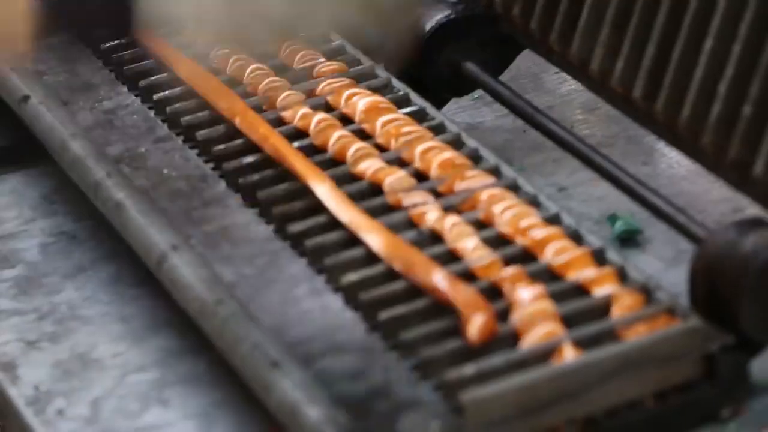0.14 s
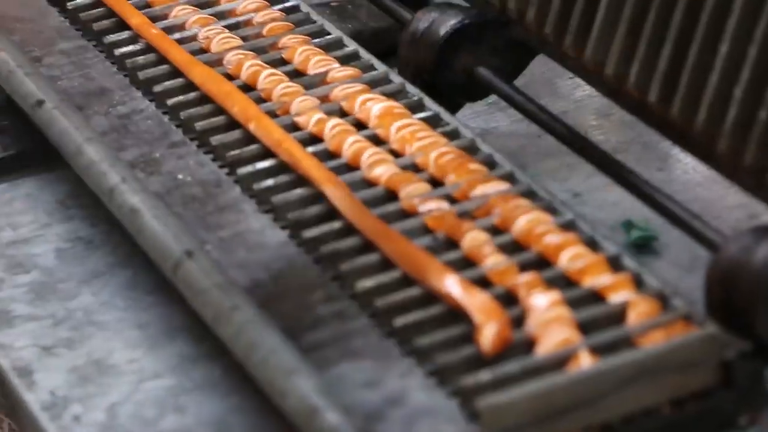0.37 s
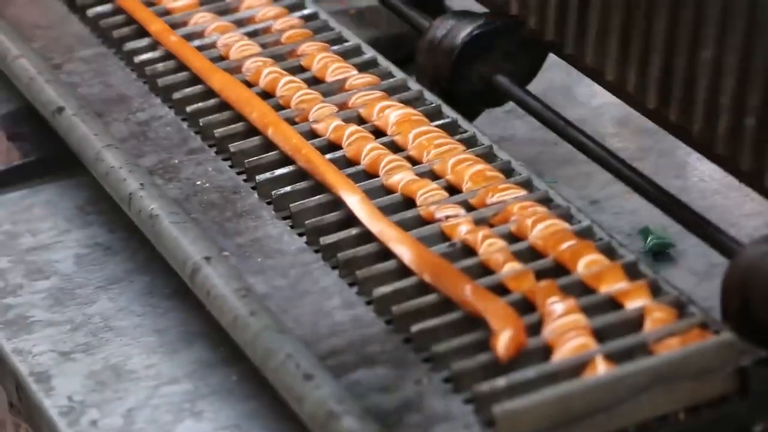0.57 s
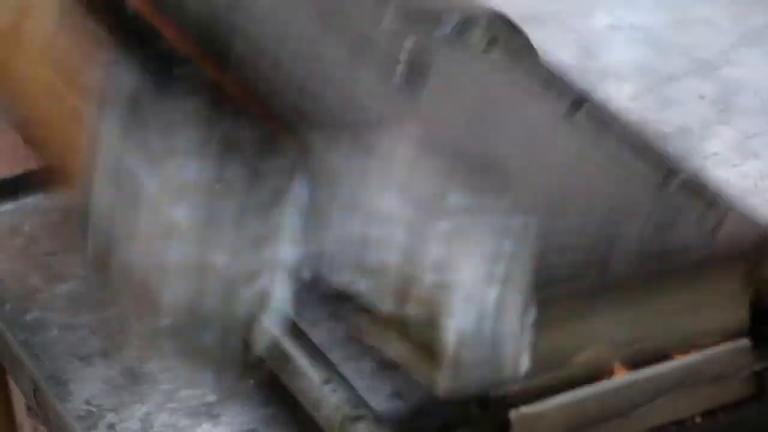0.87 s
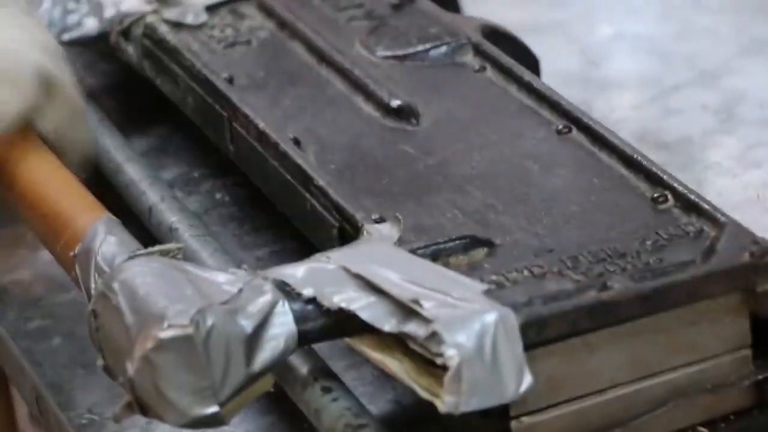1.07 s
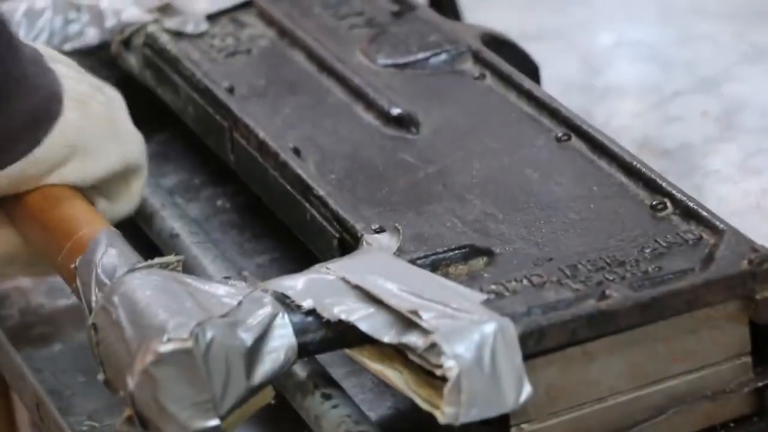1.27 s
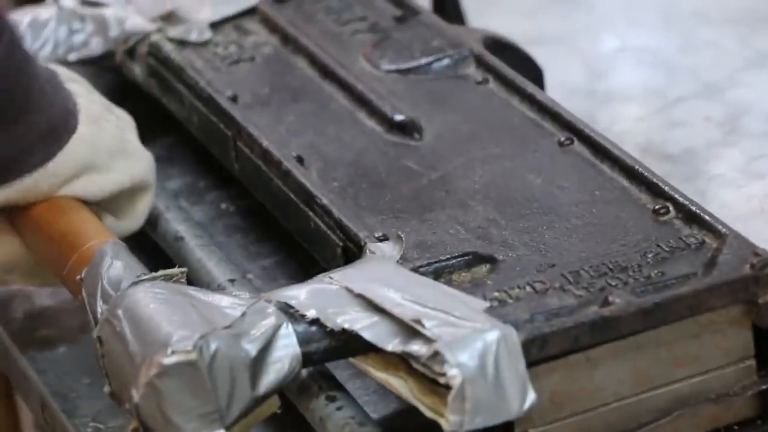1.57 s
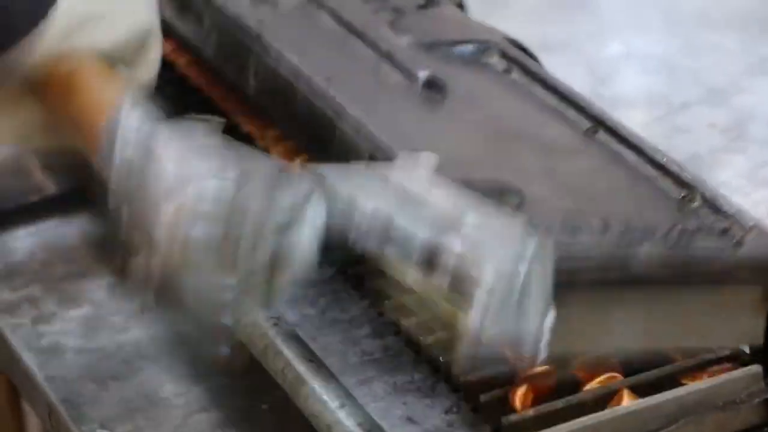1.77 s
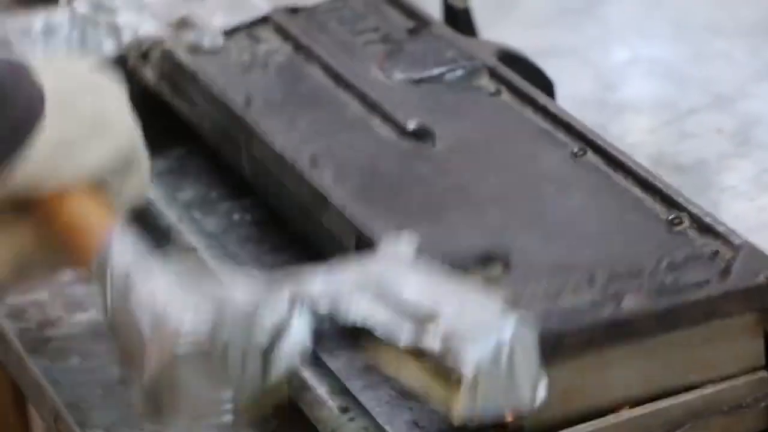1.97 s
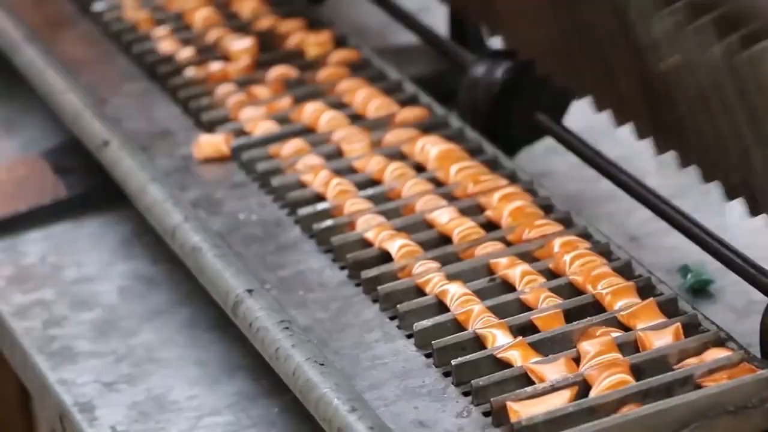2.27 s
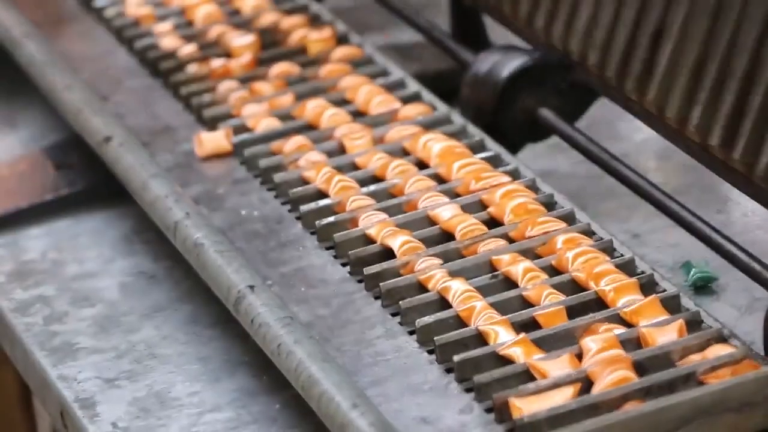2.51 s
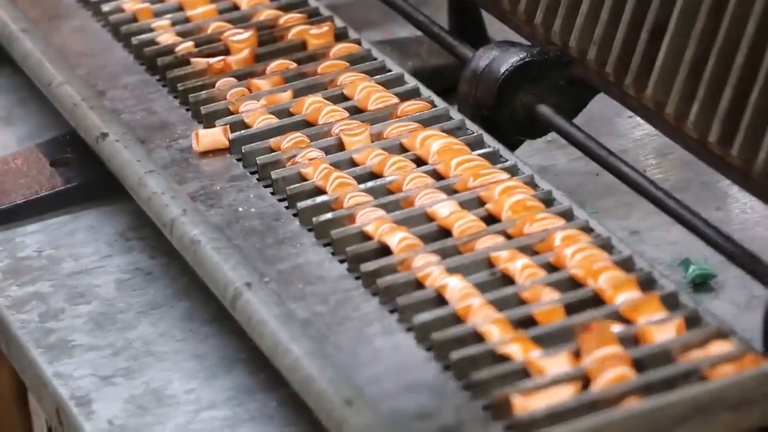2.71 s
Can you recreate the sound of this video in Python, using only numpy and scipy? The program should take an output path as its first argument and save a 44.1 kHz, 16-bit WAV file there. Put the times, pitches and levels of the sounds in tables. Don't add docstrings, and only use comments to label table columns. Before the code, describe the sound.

Close up on a workbench, a heavy iron candy cutter clacks, bangs shut and is struck repeatedly; brittle pieces crunch and scatter, bench thuds, bars ping briefly, and low distant machine noise swells back in gaps.

```python
import sys
import numpy as np
from scipy import signal
from scipy.fft import rfft, irfft, next_fast_len
from scipy.io import wavfile
from scipy.ndimage import uniform_filter1d, map_coordinates

SR = 44100
rng = np.random.default_rng(int(sys.argv[2]) if len(sys.argv) > 2 else 0)


def rack_gain(trim_db):
    fader = np.asarray(trim_db, float)
    return 10 ** (fader / 20)


def bounce(signal):
    frames = np.transpose(np.atleast_2d(signal))
    limited = np.clip(frames, -1, 1)
    pcm = np.round(limited * 32767).astype(np.int16)
    wavfile.write(sys.argv[1], SR, pcm)


N = 125685
T = np.arange(N) / SR

# start in seconds, hold in
# seconds, 60 dB decay in seconds, level in dB, brightness in dB.
CLATTERS = [(0.163, 0.024, 0.2, -20, -3), (0.308, 0.0076, 0.084, -39, -12),
            (0.4444, 0.0095, 0.089, -28, 5), (0.556, .01, 0.35, -42.5, 3),
            (0.822, 0.015, 0.14, -37, -18), (0.841, 0.054, 0.06, -20.5, 14),
            (0.851, 0.003, 0.035, -16, 13), (0.967, 0.024, 0.06, -19, 5),
            (1.01, 0.0027, .06, -20.5, 7.5), (1.0204, 0.0035, 0.017, -5, 9.5),
            (1.306, 0.018, 0.087, -35, -5), (1.402, 0.035, .08, -25.5, -5),
            (1.593, 0.0064, 0.039, -38, 11.5), (1.73, 0.031, 0.12, -32.5, -15),
            (1.754, 0.0087, 0.066, -21, -11), (1.7695, 0.023, 0.05, -17, 8),
            (1.806, 0.0054, .1, -24.5, -0.5), (1.9003, 0.0077, 0.075, -18.5, -7),
            (1.9105, .006, 0.1, -14.5, 8.5), (1.9503, 0.002, 0.03, -10, 2),
            (2.079, 0.0073, 0.2, -20, -11), (2.094, 0.011, 0.11, -13.5, 2),
                 (2.124, 0.0098, 0.13, -22.5, -2), (2.2217, 0.011, 0.052, -23.5, -14),
                 (2.261, 0.008, 0.079, -32, -14), (2.382, 0.0079, 0.021, -31.5, 4),
                 (2.5103, 0.0021, 0.045, -32, 5), (2.527, 0.082, 0.2, -22.5, 5),
                 (2.551, 0.044, .1, -21.5, 1.5), (2.63, 0.003, 0.02, -6, 3),
                 (2.637, 0.0067, 0.087, -19.5, 0), (2.648, .009, .04, -17, 2),
                 (2.707, 0.0074, 0.11, -24.5, -6)]
CANDY_BREAKS = [(.862, .005, .03, -21, 6), (.874, .003, .03, -22, 6), (.9725, .002, .03, -19, 3),
                (.978, .003, .03, -18, 8), (.985, .002, .04, -18, 2), (1.0245, .002, .03, -13, 6),
                (1.7568, .004, .04, -17, 4), (1.764, .005, .05, -20, 6), (1.778, .003, .04, -15, 10),
                (1.79, .003, .03, -18, 12), (1.9165, .003, .05, -15, 4), (1.931, .004, .04, -21, 4),
                (1.944, .006, .02, -27, 4), (1.553, .004, .05, -38, 8), (1.565, .004, .05, -36, 8),
                (2.5328, .003, .04, -22, 8), (2.543, .005, .04, -21, 8), (2.588, .004, .04, -20, 10),
                (2.602, .004, .04, -22, 6)]
# time in seconds, level in dB.
IRON_SNAPS = [(0.165, -2), (.4446, -8), (.9672, -9), (1.0118, -3), (1.0215, 6), (1.4025, -11), (1.7795, 3),
              (1.9518, 10), (2.0965, 0), (2.2222, -6), (2.3822, -11), (2.5275, -7), (2.6305, 4)]
# peak in seconds, 60 dB rise in seconds, 60 dB decay in seconds, level in dB, brightness in dB.
IRON_SLIDES = [(.92, .1, 0.58, -38, 8.5), (1.091, 0.14, 0.57, -29.5, -5), (1.178, 1, 0.13, -35, -20.5),
               (1.5, 0.037, 0.89, -40, 6), (1.84, 0.12, 0.45, -37, -2), (1.89, 0.083, 0.12, -35, -16),
               (1.97, .05, 0.47, -35, -3), (2.075, 0.5, 0.14, -23.5, -14.5), (2.03, 0.004, 1, -33, 14),
               (2.682, 0.08, 0.28, -27, -11)]
# centre in Hz, width in Hz, level in dB.
BAR_MODES = [(1160, 16, -44), (1807, 10, -11), (2055, 250, -8.5), (2700, 52, -31), (3446, 31, 22),
             (3770, 50, 31), (5147, 53, 37), (5660, 108, 36), (6290, 55, -8), (8180, 42, -46),
             (9900, 65, -34), (13270, 150, 20)]
# frequency in Hz, density in dB per Hz.
CANDY_COLOUR = [(180, -64), (300, -18), (685, -10), (1180, 1), (1880, -4), (2900, -1), (4650, -2),
                (5700, -3.5), (15500, -19)]
# start in seconds, level in dB, pitch
# in Hz, 60 dB decay in seconds.
BENCH_THUDS = [(0.8245, -19, 600, 0.1), (.828, -16, 450, 0.07), (1.019, -17, 850, 0.06),
               (1.411, -25, 44.8, 0.3), (1.755, -18, 800, .07), (1.766, -10, 167, 0.051),
               (1.888, -31, 593, 0.14), (1.912, -19, 487, 0.054), (1.951, -13.5, 494.8, 0.082),
               (1.956, -23, 216, 0.23), (2.097, -17.5, 302, 0.041), (2.222, -16, 600, 0.1),
               (2.261, -22, 594, 0.12), (2.24, -27.5, 115, .2), (2.631, -14.5, 420, 0.095),
               (2.095, -23, 75, 0.13), (1.02, -25, 250, .08), (1.757, -18, 280, .08), (1.915, -26, 70, .2),
               (.85, -28, 100, .15), (2.632, -26, 110, .12), (1.883, -25, 800, .08)]
# start in seconds, level in dB,
# pitch in Hz, 60 dB decay in seconds.
BAR_PINGS = [(0.18, -21.5, 1500, 0.17), (.308, -34, 3560, 0.06), (.854, -9, 2000, 0.054),
             (1.022, -7, 1170, 0.03), (1.0215, -1, 3850, 0.02), (1.0205, -4, 5950, .012),
             (1.31, -24, 3500, 0.05), (1.403, -33, 2700, 0.12), (1.755, -13, 760, 0.07),
             (1.758, -10.5, 1110, 0.1), (1.776, -13, 2760, .08), (1.917, -12.5, 1150, 0.081),
             (1.9165, -9, 2750, 0.06), (1.911, -9, 5150, .04), (1.77, -13, 1200, .04),
             (1.7568, -16, 4000, .03), (1.951, -12, 1600, .03), (1.956, -22, 105, .2),
             (1.956, -25, 212, .15), (1.956, -23, 310, .12), (.8285, -15, 400, .03), (.826, -16, 850, .04),
             (.845, -16, 5500, .03), (.886, -15, 5750, .03), (.889, -17, 2850, .05),
             (.9725, -15, 3400, .04), (2.527, -16, 2180, .03), (2.544, -16, 5700, .04),
             (2.589, -13, 5390, .03), (2.6305, -6, 5450, .02), (2.65, -13, 2200, .03),
             (2.632, -23, 470, .07), (2.095, -13, 2000, .03), (2.1, -14, 3750, .08), (1.42, -28, 1450, .1),
             (1.402, -27, 3600, .08), (2.511, -20, 2140, 0.027), (2.488, -50, 13500, 0.28),
             (2.476, -53, 10800, .08), (2.552, -15.5, 3880, .12), (2.56, -18, 2780, .15),
             (2.601, -8, 4350, 0.034), (2.714, -23, 4850, 0.044), (2.585, -27, 10900, 0.19)]
# frequency in Hz, density in dB per Hz.
SHOP_COLOUR = [(35, -43), (70, -5), (300, -9.5), (1200, -14.5), (2500, -25.5), (5800, -33.5), (7500, -43.5),
               (15500, -51)]
# time in seconds, level in dB.
SHOP_DRIFT = [(0.0, -0.5), (1.42, -1.5), (1.53, 1.5), (1.68, -1), (2.85, -3.5)]
# frequency in Hz, rms level in dB.
HUM_LINES = [(107.7, -45.5), (247.6, -47.5), (360.7, -37.5), (479.1, -52)]
# time in seconds, level in dB.
DRAUGHT_LEVEL = [(0.0, -54), (0.18, -39), (0.29, -33.5), (0.42, -48), (0.85, -28), (0.96, -51),
                 (1.01, -27.5), (1.08, -53), (1.21, -33.5), (1.46, -36.5), (1.47, -33.5), (2.23, -64),
                 (2.72, -39), (2.85, -62)]


def unit(x):
    return x / np.sqrt(np.mean(x ** 2) + 1e-20)


def along(points, hz):
    f, v = np.transpose(points)
    return np.interp(np.log(hz + 1), np.log(f + 1), v)


def curve(rows):
    return np.interp(T, *np.transpose(rows))


def wobble(rate):
    knots = rng.standard_normal(int(N * rate / SR) + 4)
    return map_coordinates(knots, [T * rate])


def filtered(x, response):
    m = next_fast_len(N + SR // 2)
    return irfft(rfft(x, m) * response(np.fft.rfftfreq(m, 1 / SR)), m)[..., :N]


def causal(gain):
    cepstrum = irfft(np.log(gain + 1e-6))
    half = len(cepstrum) // 2
    cepstrum[1:half] *= 2
    cepstrum[half + 1:] = 0
    return np.exp(rfft(cepstrum))


def clatter():
    ring_db, widen, pivot_hz = 3.5, 2, 2040
    top_db = max(db for _, _, db in BAR_MODES)

    def bars(f):
        gain = 1
        for centre, width, db in BAR_MODES:
            offset = 2 * (f - centre) / width / widen
            gain = gain + rack_gain(ring_db + (db - top_db) / 4) / (1 + offset ** 2)
        return gain

    def body(f):
        return causal(rack_gain(along(CANDY_COLOUR, f)) * bars(f))

    def low(f):
        return 1 / (1 + 1j * f / pivot_hz)

    scale = np.std(filtered(rng.standard_normal(N), body))
    dull, bright = strokes()
    force = filtered(dull, low) + filtered(bright, lambda f: 1 - low(f))
    return filtered(force, body) / scale


def strokes():
    attack_s = .0005
    rough = rattle()
    power, rub, snaps = np.zeros((3, 2, N))

    def halves(db, bright_db):
        return rack_gain(db + np.array([[-bright_db], [bright_db]]) / 2)

    for s, hold, t60, db, bright_db in CLATTERS + CANDY_BREAKS:
        decay = rack_gain(-60 * np.clip(T - s - hold, 0, 9) / t60)
        shape = np.clip((T - s) / attack_s, 0, 1) * decay
        power += (shape * halves(db, bright_db)) ** 2
    for s, db in IRON_SNAPS:
        snaps[:, round(s * SR)] = rack_gain(db)
    for s, rise, t60, db, bright_db in IRON_SLIDES:
        shape = rack_gain(-60 * np.maximum((s - T) / rise, (T - s) / t60))
        rub += (shape * halves(db, bright_db)) ** 2
    smooth = unit(rng.standard_normal(N) + .5 * rough)
    return np.sqrt(power) * rough + snaps + np.sqrt(rub) * smooth


def rattle():
    cracks_per_s, spread_db, grit_db, chink_db, flurry_db = 3000, 5, 1, -9, 1.1
    cracks = (rng.random(N) < cracks_per_s / SR) * rng.uniform(-1.17, 1, N)
    cracks = cracks * rack_gain(spread_db * rng.random(N))
    rough = unit(cracks) + rack_gain(grit_db) * rng.standard_normal(N) + rack_gain(chink_db) * chinks()
    return unit(rough * rack_gain(flurry_db * (wobble(150) + wobble(300))))


def chinks():
    per_s, middle_hz, cycles = 2200, 4183, 14
    when, pitch, size = rng.random((3, int(per_s * N / SR)))
    hz = (middle_hz * np.exp(2.2 * (pitch - .5)))[:, None]
    k = np.arange(SR // 100)
    level = np.sqrt(hz) * rack_gain(10 * size[:, None] ** 2 - 30 * hz * k / SR / cycles)
    tones = level * np.sin(2 * np.pi * hz * k / SR)
    places = (when * N).astype(int)[:, None] + k
    return unit(np.bincount(places.ravel(), tones.ravel())[:N])


def bench():
    beat = 1.03
    out, t = np.zeros(N + SR), T[:SR // 3]
    onset = 1 - np.exp(-t / .001)
    for s, db, hz, t60 in BENCH_THUDS:
        band = signal.butter(2, [hz / 2.2, hz * 2.2], "bandpass", fs=SR, output="sos")
        burst = unit(signal.sosfilt(band, rng.standard_normal(len(t))))
        out[round(s * SR):][:len(t)] += rack_gain(db - 60 * t / t60) * onset * burst
    for s, db, hz, t60 in BAR_PINGS:
        pair = np.sin(2 * np.pi * hz * t) + .5 * np.sin(2 * np.pi * beat * hz * t)
        out[round(s * SR):][:len(t)] += rack_gain(db - 60 * t / t60) * onset * pair
    return out[:N]


def echo(x):
    echo_db, t60 = -18, .18
    t = T[:SR // 2]
    tail = rng.standard_normal(len(t)) * rack_gain(-60 * t / t60)
    wet = signal.fftconvolve(x, tail / np.linalg.norm(tail))[:N]
    return rack_gain(echo_db) * filtered(wet, lambda f: 1 / (1 + 1j * f / 5000))


def ducking(loud):
    from_db, slope, recover_db_per_s = -20, 1, 53
    level_db = 10 * np.log10(np.abs(uniform_filter1d(loud ** 2, size=600)) + 1e-12)
    cut_db = slope * np.clip(level_db - from_db, 0, 60)
    ramp = recover_db_per_s * T
    return rack_gain(ramp - np.maximum.accumulate(cut_db + ramp))


def shop_noise():
    z = signal.stft(rng.standard_normal(N + 512), nperseg=512)[2]
    field = uniform_filter1d(uniform_filter1d(rng.standard_normal(z.shape), 5, 0), 10, 1)
    patchy = signal.istft(z * rack_gain(1.23 * unit(field)), nperseg=512)[1][:N]
    noise = unit(filtered(patchy, lambda f: rack_gain(along(SHOP_COLOUR, f))))
    return noise * rack_gain(-30.5 + curve(SHOP_DRIFT))


def shop_hum():
    hum = np.zeros(N)
    for hz, db in HUM_LINES:
        level = rack_gain(db + 2 + 2 * wobble(9))
        hum += level * np.sin(2 * np.pi * hz * T + .5 * wobble(12))
    return hum


def draught():
    def band(f):
        return (f / 25) ** 2 / (1 + (f / 25) ** 2) / (1 + (f / 50) ** 4)

    return unit(filtered(rng.standard_normal(N), band)) * rack_gain(curve(DRAUGHT_LEVEL))


def scene():
    chopper = clatter() + bench()
    duck = ducking(chopper)
    background = duck * shop_noise() + duck ** 1.6 * shop_hum() + draught()
    return (chopper + echo(chopper) + background)[None]


def top_cut(x):
    return signal.sosfilt(signal.butter(12, 15690, fs=SR, output="sos"), x)


def record(dry):
    ceiling, knee, top_hz = 1.02, 4, 15700
    x = filtered(dry, lambda f: f < top_hz)
    mix = x / (1 + np.abs(x / ceiling) ** knee) ** (1 / knee)
    return top_cut(mix)


dry = scene()
out = record(dry)
bounce(out)
```